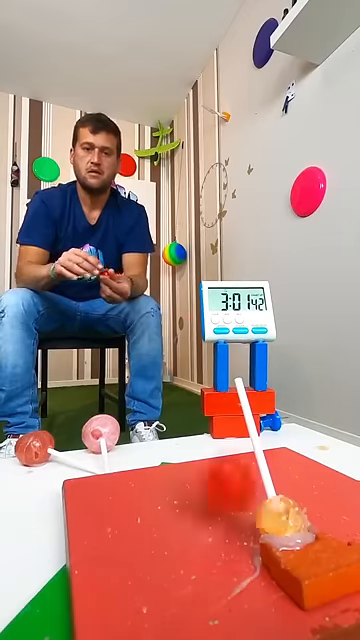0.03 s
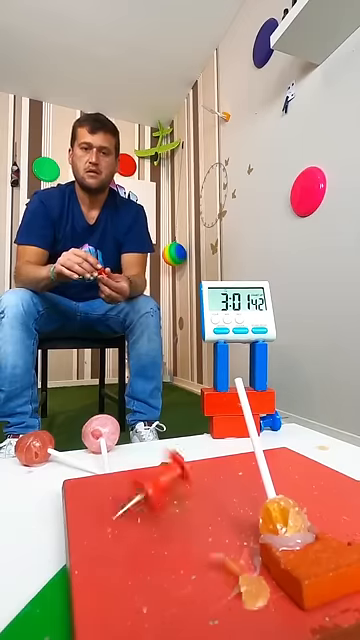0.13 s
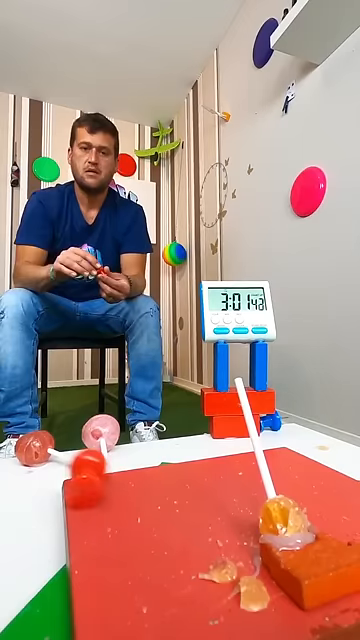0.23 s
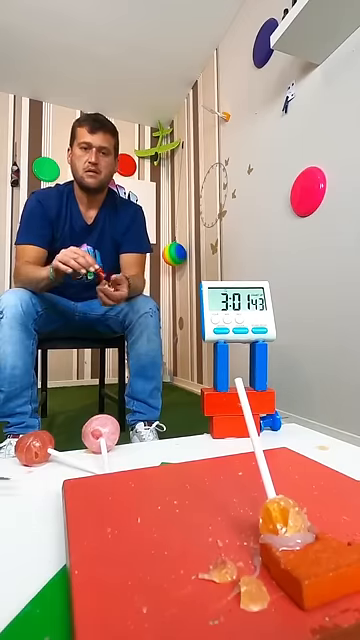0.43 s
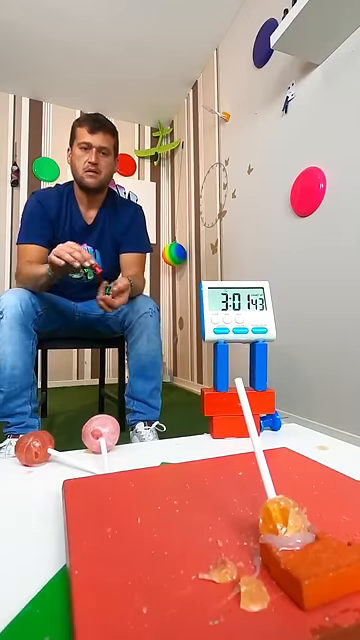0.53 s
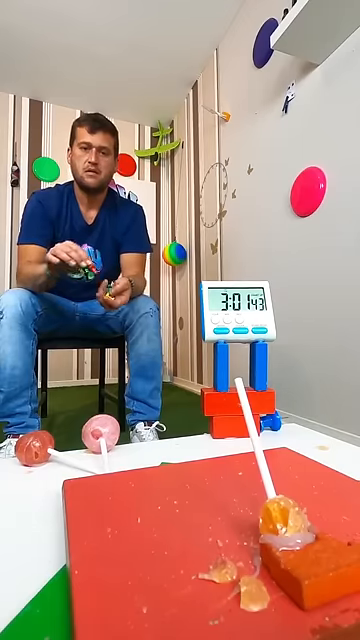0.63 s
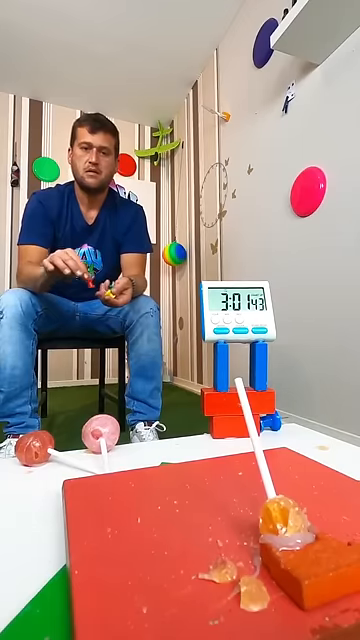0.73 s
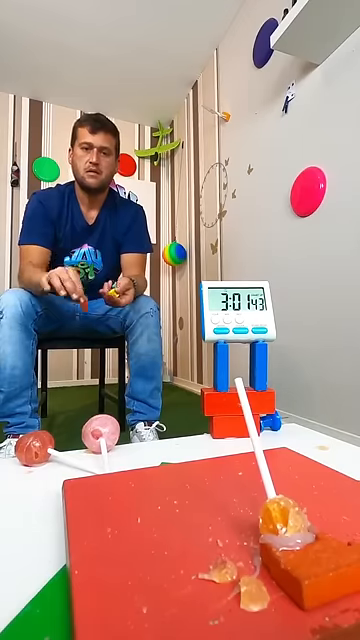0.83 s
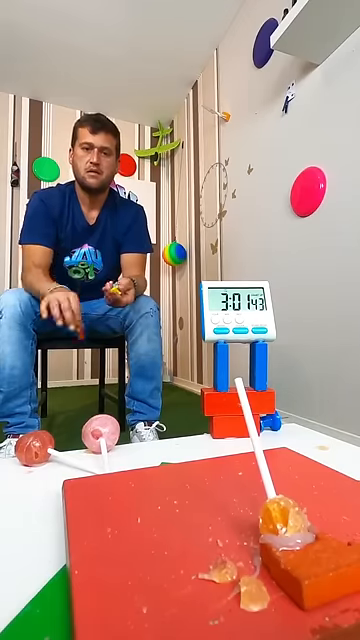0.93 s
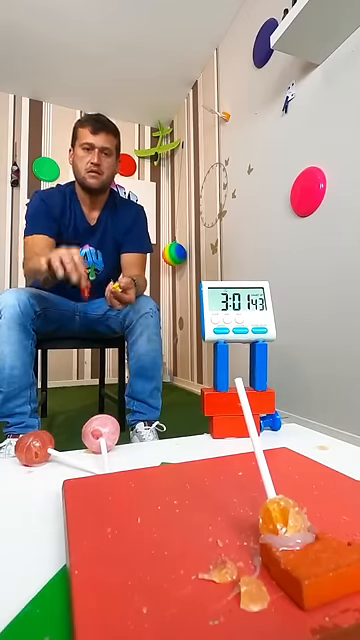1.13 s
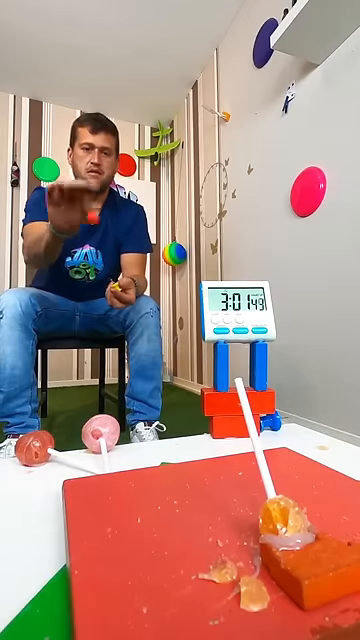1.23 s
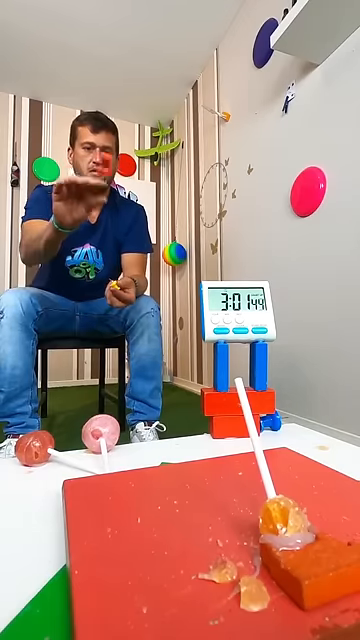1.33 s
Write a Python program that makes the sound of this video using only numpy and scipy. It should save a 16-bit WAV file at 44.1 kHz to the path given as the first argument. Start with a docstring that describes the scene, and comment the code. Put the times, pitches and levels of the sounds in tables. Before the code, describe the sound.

A small toy lands on a tabletop board with a sharp crack, then clatters away.

```python
"""After two soft hollow knocks and a faint tap, a small hard toy lands on a plastic board on a table.
Close to the microphone its shell clicks, the board slaps and cracks, hard candy on the board rings
and the table thumps. The toy tumbles on in knocks that grow lighter. One more hollow knock sounds
further back, then the toy drops off with one far tap. A small bare room echoes every contact,
over a faint steady rumble and hiss."""
import sys
import numpy as np
from scipy import signal
from scipy.fft import rfft, irfft, next_fast_len
from scipy.io import wavfile

SR = 44100
rng = np.random.default_rng(int(sys.argv[2]) if len(sys.argv) > 2 else 0)


def dump_mix(stems):
    """Bounce the given channels to the path in sys.argv[1] as a 16-bit WAV at rate SR."""
    frames = np.atleast_2d(stems).T  # one column per channel
    limited = np.clip(frames, -1, 1)  # hard clip at full scale
    pcm = np.round(limited * 32767).astype(np.int16)
    wavfile.write(sys.argv[1], SR, pcm)


N = 61739

# Toy contacts. Each row: start in seconds, knock level in dB, knock centre in Hz, hardness low-pass
# in Hz, slap level in dB, crack level in dB, thump level in dB, thump centre in Hz, room send in dB.
CONTACTS = [ (.2272, -44, 1200, 3030, -61.5, -49.5, -41.5, 200, 16),
            (.2379, -19.5, 1100, 4940, -18, -18.5, -23, 130, -8),
            (0.2565, -23, 3750, 8100, -21, -30.5, -28.5, 100, -7),
            (.2860, -29, 1700, 4000, -36, -40.5, -50.5, 100, 6.5),
            (0.3333, -31.5, 3000, 6030, -19.5, -37, -31, 100, -10),
            (0.3603, -37.5, 1800, 3020, -37.5, -63, -49.5, 200, 10),
            (0.4348, -26, 750, 1990, -42, -54, -49, 250, -8),
            (.4387, -20, 890, 2400, -21.5, -42.5, -33, 325, -5),
            (.5140, -34, 1800, 3000, -48, -39.5, -81, 200, -5),
            (.5179, -18, 1150, 2400, -25, -36.5, -44.5, 200, -4.5),
            (0.5367, -18, 1440, 3270, -35, -49, -58, 60, -22),
            (0.5712, -30.5, 1300, 3000, -59, -47, -47, 70, -7),
            (.6185, -20, 2120, 5400, -38, -46, -42, 80, -5),
            (0.6574, -31, 1580, 2680, -62.5, -61, -50, 75, 0),
            (0.6804, -33, 1470, 2370, -48, -79.5, -46, 300, -17),
            (.7030, -33, 1800, 2800, -47, -75.5, -44, 300, -3),
            (0.7103, -22, 1600, 2800, -43, -77, -45, 300, -4),
            (.7570, -43.5, 1700, 1915, -62, -88.5, -73, 250, 1),
            (0.772, -38.5, 1700, 1910, -60, -90, -45, 280, -17),
            (.7880, -35, 1750, 2234, -73, -77, -73, 280, -11.5),
            (.8025, -44, 1670, 1797, -75, -85, -77, 320, -6),
            (.8330, -45, 2170, 2800, -75, -81, -68, 250, -7), ]
# Modes of toy shell, table top and candy. Each row: frequency in Hz, level in dB, T60 in seconds.
SHELL_MODES = [(726, -12, 0.067), (763.3, -4.5, .06), (941, -4.5, 0.012), (1176, -10, 0.03),
               (1289, 1, 0.017), (1628.6, 1, 0.026), (1831, -1.5, 0.021), (2065, 0, 0.014),
               (2615, -0.5, 0.01), (3058, 5, 0.0071), (3400, 3, .013), (3930, -1, 0.01), (5700, 6, 0.0047),
               (6760, 0.5, 0.0065)]
TABLE_MODES = [(47.6, -8.5, 0.04), (74.1, -2, 0.59), (104, -11.5, .15), (161.7, 1, 0.17),
               (195.3, -1.5, 0.11), (252.6, -2, 0.1), (315, 3.5, .08), (380, 1.5, .08), (431, 5, 0.078),
               (597, 1, 0.14)]
CANDY_MODES = [(3640, -22.5, 0.29), (3845, -19.5, 0.32), (8500, -20.5, .05), (12950, -22, .03)]
# Far taps. Each row: start in seconds, level in dB, room send in dB.
FAR_TAPS = [(0.1622, -49, 9), (1.0436, -37.5, 9.5)]
# Hollow knocks. Each row: start in seconds, level in dB.
HOLLOW_KNOCKS = [(.001, -48.5), (.179, -35.5), (.882, -50)]
# Spectra of board slap, edge crack, far tap, hollow knock, room echo and room tone.
# Each row: frequency in Hz, gain in dB.
SLAP_SPECTRUM = [(100, -25), (450, -16.5), (650, 6), (1200, -8), (2000, 3), (2750, -6.5), (3700, 0),
                 (4700, -5), (5700, -8.5), (7200, -16.5), (9000, -21.5), (12000, -32.5), (16000, -45)]
CRACK_SPECTRUM = [(1000, -8.5), (4000, -7.5), (5600, -5), (7400, -10.5), (8800, 2.5), (9900, -6.5),
                  (11000, -16), (13200, -11.5), (14200, -29.5), (16000, -42.5)]
TAP_SPECTRUM = [(60, -17), (160, -1.5), (300, -2.5), (420, 3.5), (600, -10.5), (950, 1.5), (1400, 4),
                (1800, -8), (2300, -4), (3200, -12.5), (4300, -18), (6500, -26.5), (9000, -16.5),
                (11000, -33), (15000, -47.5)]
HOLLOW_SPECTRUM = [(100, -28), (300, -14.5), (450, 0.5), (580, -7), (800, -15.5), (1000, -14), (1110, 1.5),
                   (1250, -11), (1500, -22.5), (2700, -24.5), (3700, -24.5), (4500, -31), (12000, -51)]
ECHO_SPECTRUM = [(60, -1), (300, -2), (700, 2), (1300, -5.5), (2600, -2.5), (6000, -6), (9000, -9.5),
                 (14000, -4.5)]
ROOM_TONE_SPECTRUM = [(25, -14.5), (150, 0.5), (400, -5.5), (1000, -14), (2500, -18), (5000, -30.5),
                      (10000, -34), (16000, -44.5)]
# Room decay. Each row: frequency in Hz, T60 in seconds.
ROOM_T60_S = [(100, 0.45), (400, 0.56), (1000, 0.42), (2800, 0.55), (4500, 0.45), (7000, 0.62),
              (14000, 0.41)]
# Difference between the two microphone ports. Each row: frequency in Hz, gain in dB.
SIDE_SPECTRUM = [(100, -39), (3500, -46), (4800, -22.5), (7000, -10.5), (9500, -18.5), (12500, -2.5)]

SHORT_SAMPLES, LONG_SAMPLES = 2048, 24576
SHELL_RADIATES_ABOVE_HZ = 877
ROOM_DELAY_S, ROOM_BUILD_S, ROOM_TONE_DB = 0.0023, 0.0027, -68.5
PEAK_LIMIT, BAND_LIMIT_HZ = 0.95, 16300
RIGHT_LEAN_DB, LEAN_ABOVE_HZ = 2.5, 11300


def tumble():
    """Each contact excites table, shell, board and candy, then echoes."""
    out = np.zeros(N)
    for (start_s, knock_db, knock_hz, hardness_hz,
         slap_db, crack_db, thump_db, thump_hz, send_db) in CONTACTS:
        hit = amp(thump_db) * table_thump(thump_hz)
        add(hit, 0, amp(knock_db) * shell_knock(knock_hz, hardness_hz))
        add(hit, 0, amp(slap_db) * board_slap())
        add(hit, 0, amp(crack_db) * edge_crack())
        add(hit, 0, amp(crack_db) * candy_ring())
        add(out, start_s, in_room(hit, send_db))
    return out


def shell_knock(centre_hz, hardness_hz):
    """The shell rings, too small to radiate bass; a softer contact is duller."""
    modes = struck_modes(SHELL_MODES, centre_hz, spread_octaves=0.79, detune=0.015)
    shell = ring(modes, scatter_db=3.56, samples=2 * SHORT_SAMPLES)
    radiated = cut(shell, SHELL_RADIATES_ABOVE_HZ, "high", order=4)
    return normalise(cut(radiated, hardness_hz, "low", order=2))


def board_slap():
    """The plastic board's dense resonances die quickly."""
    return burst(SLAP_SPECTRUM, t60_s=0.026, attack_s=0.00017)


def edge_crack():
    """The edge gives a sharp, bright crack."""
    return burst(CRACK_SPECTRUM, t60_s=0.018, attack_s=0.0009)


def table_thump(centre_hz):
    """The table top gives way with a dull boom."""
    modes = struck_modes(TABLE_MODES, centre_hz, spread_octaves=1.4, detune=0.005)
    boom = ring(modes, scatter_db=0.5, samples=LONG_SAMPLES)
    return normalise(cut(boom, 790, "low", order=2))


def candy_ring():
    """Hard candy on the board rings with each crack."""
    return ring(CANDY_MODES, scatter_db=1.5, samples=LONG_SAMPLES // 2)


def far_taps():
    """Taps across the room, mostly echo."""
    out = np.zeros(N)
    for start_s, level_db, send_db in FAR_TAPS:
        tap = amp(level_db) * burst(TAP_SPECTRUM, t60_s=0.019, attack_s=0.0005)
        add(out, start_s, in_room(tap, send_db))
    return out


def hollow_knocks():
    """Soft knocks further back, slow to fade."""
    out = np.zeros(N)
    for start_s, level_db in HOLLOW_KNOCKS:
        knock = burst(HOLLOW_SPECTRUM, t60_s=0.83, attack_s=0.002, samples=LONG_SAMPLES)
        add(out, start_s, amp(level_db) * knock)
    return out


def in_room(x, send_db):
    """Direct sound plus a fresh echo tail; each band decays at its own rate."""
    hz, time_s, bands = signal.stft(rng.standard_normal(LONG_SAMPLES), SR, nperseg=256)
    bands = bands * np.exp(-np.log(1000) * time_s / along(ROOM_T60_S, hz)[:, None])
    build_up = 1 - np.exp(-np.maximum(clock(LONG_SAMPLES) - ROOM_DELAY_S, 0) / ROOM_BUILD_S)
    tail = signal.istft(bands, SR, nperseg=256)[1][:LONG_SAMPLES] * build_up
    response = amp(send_db) * colour(tail / np.linalg.norm(tail), ECHO_SPECTRUM)
    response[0] += 1  # direct path
    return signal.fftconvolve(x, response)


def room_tone():
    """Faint steady rumble and hiss."""
    noise = colour(rng.standard_normal(N), ROOM_TONE_SPECTRUM)
    return amp(ROOM_TONE_DB) * noise / noise.std()


def struck_modes(modes, centre_hz, spread_octaves, detune):
    """A contact point favours modes near centre_hz; each is detuned at random."""
    struck = []
    for hz, db, t60_s in modes:
        loss_db = 20 * np.log10(1 + (np.log2(hz / centre_hz) / spread_octaves) ** 2)
        struck.append((hz * (1 + detune * rng.standard_normal()), db - loss_db, t60_s))
    return struck


def ring(modes, scatter_db, samples):
    """Damped modes, levels scattered at every blow."""
    out = np.zeros(samples)
    for hz, db, t60_s in modes:
        gain = amp(db + scatter_db * rng.standard_normal())
        out += gain * np.sin(2 * np.pi * hz * clock(samples)) * fade(t60_s, samples)
    return out


def burst(spectrum, t60_s, attack_s, samples=SHORT_SAMPLES):
    """Dense resonances as decaying, filtered noise."""
    envelope = fade(t60_s, samples) * (1 - np.exp(-clock(samples) / attack_s))
    return normalise(colour(rng.choice([-1, 1], samples) * envelope, spectrum))


def colour(x, spectrum):
    """Minimum-phase filter from (Hz, dB) points."""
    size = 2 * next_fast_len(len(x) * 2 // 3)
    gain = amp(along(spectrum, np.fft.rfftfreq(size, 1 / SR)))
    cepstrum = irfft(np.log(gain), size)
    cepstrum[1:size // 2] *= 2
    cepstrum[size // 2 + 1:] = 0
    return irfft(rfft(x, size) * np.exp(rfft(cepstrum)), size)[:len(x)]


def cut(x, hz, kind, order):
    """High-pass or low-pass."""
    return signal.sosfilt(signal.butter(order, hz, kind, fs=SR, output="sos"), x)


def normalise(x):
    """Scale to the energy of 10 ms at rms 1."""
    return x / np.sqrt(np.sum(x ** 2) / (0.01 * SR) + 1e-20)


def along(points, hz):
    """Interpolate (Hz, value) points on a log axis."""
    point_hz, values = np.transpose(points)
    return np.interp(np.log(hz + 1), np.log(point_hz + 1), values)


def fade(t60_s, samples):
    """Exponential decay, 60 dB in t60_s."""
    return np.exp(-np.log(1000) * clock(samples) / t60_s)


def clock(samples):
    """Sample times in seconds."""
    return np.arange(samples) / SR


def amp(db):
    """Decibels to gain."""
    return 10 ** (np.asarray(db) / 20)


def add(track, start_s, x):
    """Mix x in from start_s."""
    start = max(0, round(start_s * SR))
    track[start:start + len(x)] += x[:len(track) - start]


def scene():
    """Two close microphone ports hear the same bass and slightly different treble."""
    mid = tumble() + far_taps() + hollow_knocks() + room_tone()
    scatter = rng.standard_normal(SHORT_SAMPLES) * fade(0.025, SHORT_SAMPLES)
    scattered = signal.fftconvolve(mid, scatter / np.linalg.norm(scatter))[:N]
    side = colour(scattered, SIDE_SPECTRUM)
    return np.array([mid + side, mid - side])


def record(dry):
    """Round off the peaks, lean the top treble to the right, limit the band."""
    rounded = dry / (1 + np.abs(dry / PEAK_LIMIT) ** 6) ** (1 / 6)
    size = next_fast_len(N + SR // 2)
    hz = np.fft.rfftfreq(size, 1 / SR)
    shelf = 1 - 1 / (1 + (hz / LEAN_ABOVE_HZ) ** 20)
    lean = amp(np.outer([-1, 1], RIGHT_LEAN_DB * shelf))
    low_pass = 1 / np.sqrt(1 + (hz / BAND_LIMIT_HZ) ** 160)
    return irfft(rfft(rounded, size) * lean * low_pass, size)[:, :N]


dry = scene()
out = record(dry)
dump_mix(out)
```